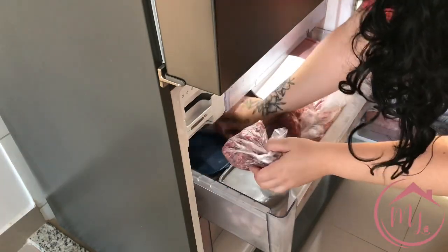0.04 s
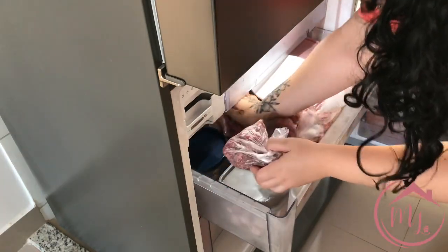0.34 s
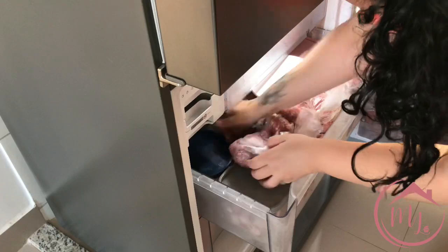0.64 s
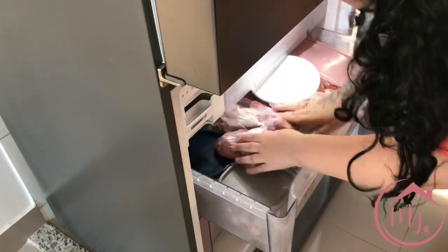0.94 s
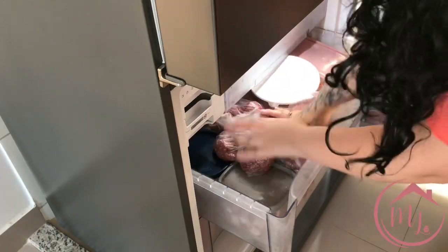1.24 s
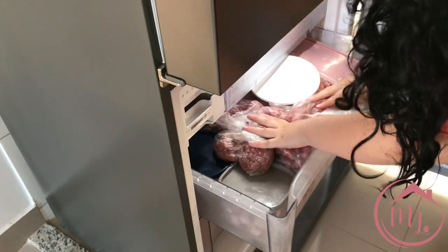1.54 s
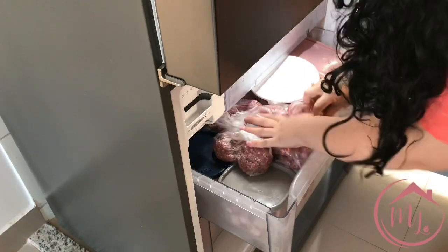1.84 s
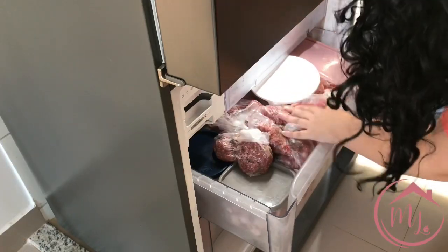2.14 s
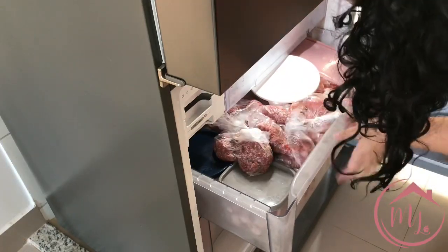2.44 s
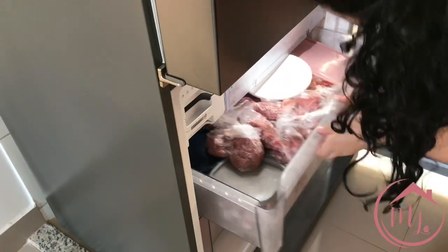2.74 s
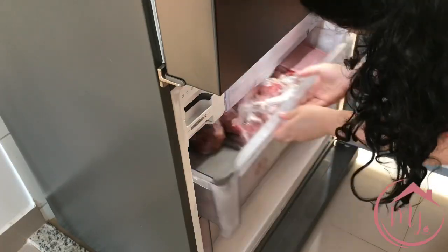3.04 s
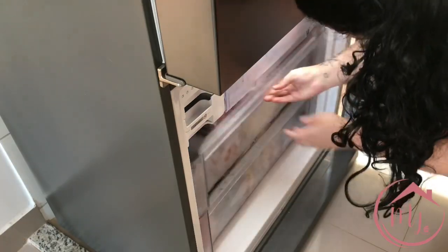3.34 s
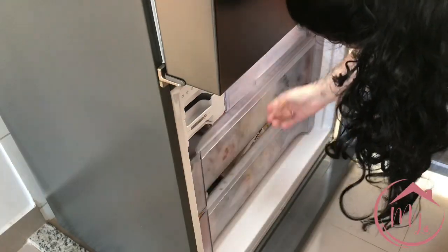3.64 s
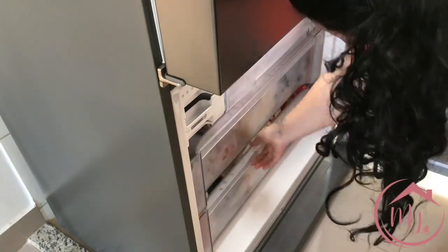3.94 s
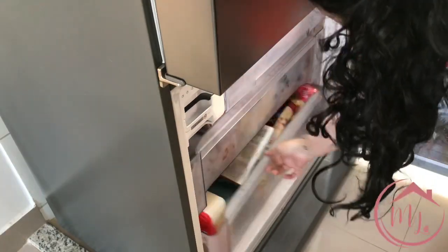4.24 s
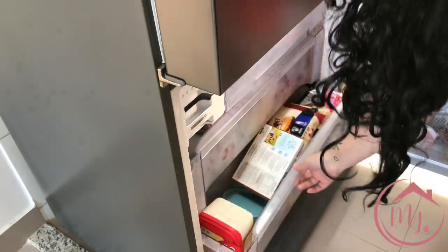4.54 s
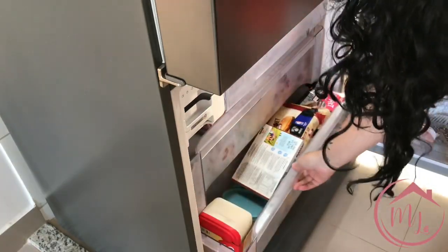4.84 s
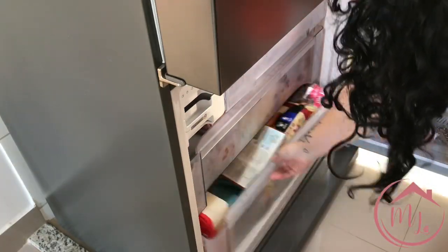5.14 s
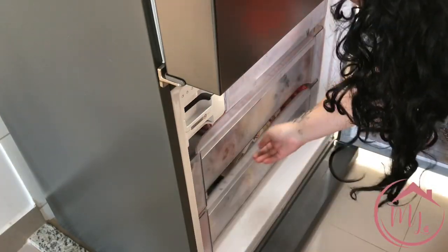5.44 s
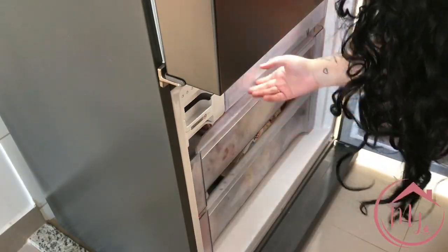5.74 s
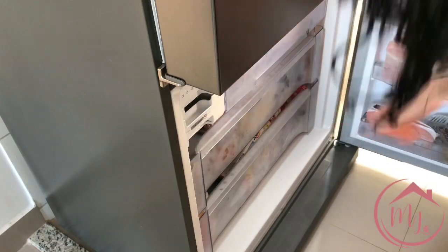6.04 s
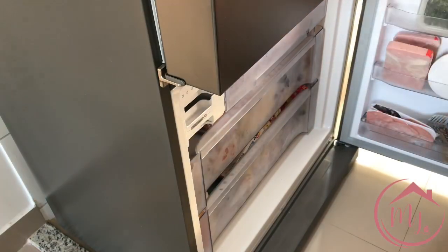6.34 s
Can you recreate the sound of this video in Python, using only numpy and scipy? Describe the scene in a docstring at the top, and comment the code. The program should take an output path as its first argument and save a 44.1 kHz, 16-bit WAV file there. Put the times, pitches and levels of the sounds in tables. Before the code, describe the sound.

Over a freezer's steady hum, hard frozen packs clack together, one plastic drawer slides shut, and another slides out and clatters closed.

```python
"""A freezer hums in a small tiled kitchen. Hands rub thin plastic bags, with a faint whistle at first,
while rock-hard packs of meat drop into a drawer, cracking together and knocking its floor.
The hands smooth the film until it catches and judders, and arms brush the plastic.
The upper drawer grinds home on its runners and stops with a thud that rocks its load.
The lower one slides out, then is shut with a clatter, and its contents settle."""
import sys
import numpy as np
from scipy import signal
from scipy.fft import rfft, irfft, next_fast_len
from scipy.io import wavfile
from scipy.ndimage import map_coordinates

SR = 44100
rng = np.random.default_rng(int(sys.argv[2]) if len(sys.argv) > 2 else 0)


def to_wav(s):
    """Save 16-bit WAV."""
    ch = np.atleast_2d(s).T  # columns
    pcm = np.round(np.clip(ch, -1, 1) * 32767)  # PCM
    wavfile.write(sys.argv[1], SR, pcm.astype(np.int16))


N = 291060
TIME = np.arange(N) / SR
AGE = TIME[:SR // 2]  # time since a contact [s]
# the lower drawer's stiff rim; every slide sings at these pitches: (pitch [Hz], level [dB], t60 [s])
RIM_MODES = [(2640, -13, 0.077), (2820, 1, 0.13), (2940, 0, 0.14), (3015, 12, 0.041), (3200, 2, 0.12),
             (3377, -23, 0.13)]


def amp(db):
    """Decibels to gain."""
    return 10 ** (np.asarray(db) / 20)


def unit(x):
    """Scale to rms 1."""
    return x / np.sqrt(np.mean(x ** 2) + 1e-20)


def unit_blow(x):
    """Scale a blow to rms 1 as if it lasted 20 ms."""
    return x / np.sqrt(np.sum(x ** 2) / (SR * .02))


def fade(t, t60):
    """Exponential decay, 60 dB in t60."""
    return np.exp(-np.log(1000) * t / t60)


def along(points, hz):
    """Read a curve of (Hz, value) points on a log frequency axis."""
    freqs, values = np.transpose(points)
    return np.interp(np.log(hz + 1), np.log(freqs + 1), values)


def wobble(rate):
    """A smooth random curve, rate knots a second."""
    return map_coordinates(rng.standard_normal(int(N * rate / SR) + 4), [TIME * rate])


def coloured(x, points):
    """Minimum-phase EQ through the (Hz, dB) points."""
    size = 2 * next_fast_len(len(x) // 2 + 4096)
    cepstrum = irfft(np.log(amp(along(points, np.fft.rfftfreq(size, 1 / SR)))))
    cepstrum[1:size // 2] *= 2
    cepstrum[size // 2 + 1:] = 0
    return irfft(rfft(x, size) * np.exp(rfft(cepstrum)))[:len(x)]


def add(track, s, x):
    """Mix x into the track at s seconds."""
    i = max(round(s * SR), 0)
    track[i:i + len(x)] += x[:N - i]


def gate(start, stop, attack, release):
    """Linear attack, hold until stop, then a release given as t60; all in seconds."""
    return np.clip((TIME - start) / attack, 0, 1) * fade(np.maximum(TIME - stop, 0), release)


def strokes(rows, attack, release):
    """Envelope of a series of strokes; the pressure swells or sags evenly through each."""
    power = np.zeros(N)
    for s, length, db, swell_db in rows:
        progress = np.clip((TIME - s) / length, 0, 1)
        power += (amp(db + swell_db * (progress - .5)) * gate(s, s + length, attack, release)) ** 2
    return np.sqrt(power)


def friction(spectrum, grain_db, grain_rate):
    """Countless tiny slips of uneven size, rms 1."""
    return unit(coloured(rng.standard_normal(N) * amp(grain_db * wobble(grain_rate)), spectrum))


def burst(spectrum, t60):
    """A crowd of damped modes: coloured noise that dies away."""
    return unit_blow(coloured(rng.standard_normal(len(AGE)) * fade(AGE, t60), spectrum))


def ring(modes):
    """Modes struck at new strengths each blow, t60 held to 20-300 ms; loose contacts blur their pitch."""
    hz, db, t60 = np.transpose(modes)[:, :, None]
    strength = amp(db + 2 * rng.standard_normal(db.shape)) * rng.choice([-1, 1], db.shape)
    drift = np.cumsum(rng.standard_normal((len(hz), len(AGE))), 1) * np.sqrt(0.053 * hz / SR)
    decay = fade(AGE, np.clip(t60, .02, .3))
    return unit_blow(np.sum(strength * np.sin(2 * np.pi * hz * AGE + drift) * decay, 0))


def clack(hz, shape, t60):
    """A broad, short resonance around hz."""
    # where the shape's EQ points sit: (multiple of the pitch [ratio])
    steps = np.array([.2, .5, .8, 1, 1.15, 1.45, 2, 4])
    return burst(np.column_stack([hz * steps, shape]), t60)


def kitchen(x, wet_db):
    """The sound plus a diffuse tail from the tiled room."""
    # room decay: (frequency [Hz], t60 [s])
    decay_times = [(100, 0.65), (500, .38), (3000, 0.38), (8000, 0.27), (15000, 0.13)]
    hz, t, noise = signal.stft(rng.standard_normal(len(AGE)), SR, nperseg=256)
    decaying = noise * fade(t, along(decay_times, hz)[:, None])
    tail = signal.istft(decaying, SR, nperseg=256)[1][:len(AGE)]
    tail *= 1 - np.exp(-AGE / 0.0025)
    return x + amp(wet_db) * signal.fftconvolve(x, tail / np.linalg.norm(tail))[:len(x)]


def freezer():
    """The compressor's slightly unsteady tones over a bed of fan noise."""
    # compressor hum and whine: (pitch [Hz], level [dB])
    tones = [(88, -57), (172, -63.5), (220.7, -61), (5631, -80.5), (5949, -92)]
    # fan and room air: (frequency [Hz], gain [dB])
    air_eq = [(15, -32.5), (30, -34.5), (42, -3.5), (55, -5.5), (87, -1.5), (170, -8.5), (301, -14),
              (545, -20), (936, -25.5), (1840, -30), (4490, -39.5), (7000, -44), (10500, -49),
              (15500, -48.5)]
    hum = np.zeros(N)
    for hz, db in tones:
        peak = amp(db + 1.3 * wobble(11)) * np.sqrt(2)
        hum += peak * np.sin(2 * np.pi * hz * TIME + 0.53 * wobble(7.1))
    return hum + amp(-47) * unit(coloured(rng.standard_normal(N), air_eq))


def film():
    """Thin bags hiss under the hands and scrunch where they are pressed."""
    # hands rubbing the bags: (time [s], length [s], level [dB], swell [dB])
    rubs = [(0, 0.19, -48, 2.5), (.27, 0.19, -50, -2), (.56, 0.07, -42.5, 5.5), (.70, 0.24, -41.5, -0.5),
            (1.02, 0.12, -37, 3.5), (1.24, 0.81, -45.5, -3), (1.53, 0.3, -38.5, -5), (1.81, 0.4, -44, -1.5)]
    # quick scrunches: (time [s], half width [s], level [dB])
    scrunches = [(.205, 0.00052, -35), (2.068, 0.017, -31), (2.096, 0.0092, -29.5), (4.123, 0.0034, -43.5),
                 (4.159, .003, -43), (4.445, .003, -49)]
    # hiss of the film: (frequency [Hz], gain [dB])
    hiss_eq = [(290, -35), (500, 1), (640, -4.5), (718, -4.5), (1190, 0.5), (1570, -2.5), (2330, -1),
               (3060, -0.5), (4210, -1), (9770, -1.5), (10500, -3), (15100, 2), (16000, -2.5)]
    attack_s, release_s = 0.013, .14
    held = amp(-47) * gate(0, 2.213, attack_s, release_s)  # the film whispers as long as it is held
    level = np.hypot(held, strokes(rubs, attack_s, release_s)) * amp(.7 * wobble(35))
    for s, width, db in scrunches:
        level += amp(db) * np.exp(-((TIME - s) / width) ** 2)
    return kitchen(level * friction(hiss_eq, grain_db=1.1, grain_rate=430), wet_db=-12.5)


def whistle():
    """A faint, thin whistle that swells and wavers in pitch."""
    # its one swell: (time [s], length [s], level [dB], swell [dB])
    swells = [(0, 0.46, -65, 12)]
    tone = unit(np.sin(2 * np.pi * 4705 * TIME + 1.55 * wobble(90)))
    return strokes(swells, attack=.02, release=.2) * tone


def packs():
    """Rock-hard packs crack against each other and knock the drawer floor."""
    # packs landing: (time [s], knock [dB], clack [dB], clack pitch [Hz], crack [dB])
    landings = [(.080, -44, -60.5, 1300, -61.5), (.621, -41.5, -49, 3000, -44),
                (.691, -32, -43.5, 2200, -44.5), (.735, -40, -55.5, 2200, -38), (.797, -39, -56, 2200, -53),
                (.848, -34, -34, 1790, -59.5), (.944, -25.5, -24.5, 4900, -20),
                (.961, -24, -27.5, 3700, -40), (.985, -49, -33.5, 4500, -27),
                (1.129, -34.5, -37.5, 4500, -38), (1.249, -35, -36.5, 4400, -43),
                (1.377, -40, -39, 4700, -43)]
    # packs on the drawer floor: (pitch [Hz], level [dB], t60 [s])
    floor_modes = [(189.2, 2.5, 0.65), (234, -12, 0.47), (428, -16.5, 0.11), (494, -3.5, 0.4),
                   (800, -19, 0.21), (850, 0.5, 0.76), (966, -1, 0.58), (1086, -6.5, 0.72),
                   (1109, -11.5, 0.073), (1206, -7, 0.96), (1255, -6, 0.16), (1423, 3, 0.057)]
    # frozen blocks ringing: (pitch [Hz], level [dB], t60 [s])
    ice_modes = [(3500, 1.5, .16), (4230, -1.5, .22), (4110, 2.5, 0.16), (5240, -15, .12), (5840, 6, 0.071),
                 (6070, -7, .15), (9110, -5, 0.14)]
    # dull body of the knock: (frequency [Hz], gain [dB])
    knock_eq = [(80, -20.5), (190, 2), (400, -4.5), (550, -2), (950, -7), (1400, -18.5), (2500, -17.5),
                (6000, -37.5)]
    # bright edge of the crack: (frequency [Hz], gain [dB])
    crack_eq = [(2000, -34), (5500, -3), (7000, -6), (8000, -7), (9400, 5), (10500, -7.5), (12100, 1),
                (14500, 2.5), (16000, -0.5)]
    # frozen lumps, at each step of a clack: (gain [dB])
    lump_shape = [-19.5, -3, -6.5, -0.5, -4, -18.5, -7.5, -34]
    out = np.zeros(N)
    for s, knock_db, clack_db, clack_hz, crack_db in landings:
        t60 = 0.097 * amp(-.3 * (clack_db + 34))  # a harder clack dies faster
        knock = amp(-6.5) * ring(floor_modes) + amp(-1) * burst(knock_eq, 0.26)
        # a hard contact starts with a sharp tick and sets the ice ringing
        crack = amp(-1) * burst(crack_eq, t60) + amp(-24) * burst(crack_eq, .004)
        crack += amp(-7.5) * ring(ice_modes)
        lump = clack(clack_hz, lump_shape, t60)
        blow = amp(knock_db) * knock + amp(clack_db) * lump + amp(crack_db) * crack
        add(out, s, kitchen(blow, wet_db=-4))
    return out


def thuds():
    """The whole load rocks when a pack lands or a drawer is stopped."""
    # shoves to the tub: (time [s], level [dB], pitch driven hardest [Hz])
    pushes = [(1.149, -25.5, 195), (3.421, -9.5, 98), (5.394, -9, 178), (5.442, -19, 180)]
    # the loaded tub: (pitch [Hz], level [dB], t60 [s])
    load_modes = [(50.6, -10.5, 0.3), (100.8, 3, 0.11), (138, -13.5, 0.13), (187, -1.5, 0.12),
                  (282, -2, 0.033)]
    db_per_octave = 8  # modes away from the push's pitch ring less
    hz, mode_db, t60 = np.transpose(load_modes)[:, :, None]
    out = np.zeros(N)
    for s, db, push_hz in pushes:
        strength = amp(db + mode_db - db_per_octave * np.abs(np.log2(hz / push_hz)))
        boom = np.sum(strength * np.sin(2 * np.pi * hz * AGE) * fade(AGE, t60), 0)
        add(out, s, boom * (1 - np.exp(-AGE / 0.0026)))
    return kitchen(out, wet_db=-13)


def judders():
    """A hand sticks and slips on taut film: a short low note with a rasp once a cycle."""
    # the hand catching: (time [s], length [s], slip rate [Hz], level [dB], relative rasp [dB])
    catches = [(2.096, 0.024, 268, -32.5, -15.5), (2.314, 0.041, 285.3, -33.5, -8)]
    # colour of the rasp: (frequency [Hz], gain [dB])
    rasp_eq = [(300, -2.5), (1000, -9.5), (1800, -4), (3200, -17), (9000, -25)]
    out = np.zeros(N)
    for s, length, hz, db, rasp_db in catches:
        swell = AGE / length * np.exp(-2 * (AGE / length) ** 2)
        swell = amp(db) * swell / swell.max()
        swing = np.sin(2 * np.pi * hz * AGE)
        rasp = unit(coloured(rng.standard_normal(len(AGE)) * (1 + swing), rasp_eq))
        add(out, s, swell * swing + kitchen(amp(rasp_db) * swell * rasp, wet_db=-5.5))
    return out


def brushing():
    """Arms and bags brush the plastic; firm strokes have more body."""
    # brush strokes: (time [s], length [s], level [dB], swell [dB], relative body [dB])
    brushes = [(2.22, .08, -60.5, 3, -3), (2.31, .05, -57, -2, -2), (2.38, 0.65, -62, 4, 2),
               (3.072, 0.11, -48.5, 2.5, -5), (3.29, .06, -62, 4, -5), (3.878, 0.12, -56.5, -8, 1),
               (4.096, 0.26, -57.5, 8, -3), (4.39, .18, -58.5, -5, 7), (5.115, .38, -53, 6, 3),
               (5.716, .02, -60, 3, 1), (6.17, .43, -65.5, -3, -9.5), (6.375, 0.033, -54.5, -3, -8)]
    # brushed plastic: (frequency [Hz], gain [dB])
    brush_eq = [(300, -34.5), (1000, -22), (2500, 2), (4300, -1), (7000, -1.5), (10300, -4.5), (13000, 0),
                (16000, -8)]
    crossover_hz, attack_s, release_s = 3600, .012, .2
    hiss = friction(brush_eq, grain_db=2.3, grain_rate=630)
    body = signal.sosfilt(signal.butter(3, crossover_hz, "low", fs=SR, output="sos"), hiss)
    fizz = signal.sosfilt(signal.butter(3, crossover_hz, "high", fs=SR, output="sos"), hiss)
    touch = strokes([row[:-1] for row in brushes], attack_s, release_s)
    body_rows = [(s, length, db + body_db, swell_db) for s, length, db, swell_db, body_db in brushes]
    weight = strokes(body_rows, attack_s, release_s)
    return kitchen((touch * fizz + weight * body) * amp(1.1 * wobble(30)), wet_db=-8.5)


def sliding():
    """Drawers grind on their runners, louder with speed, and their contents settle after a jolt."""
    # drawer runs: (start [s], fastest [s], stop [s], full-speed grind [dB], final rim singing [dB])
    slides = [(2.487, 3.14, 3.4, -54, -69), (4.09, 4.372, 4.56, -44.5, -54.5),
              (5.024, 5.278, 5.4, -44, -60)]
    # contents rattling: (time [s], level [dB])
    jolts = [(3.42, -42.5), (3.9, -50.5), (5.4, -33), (5.75, -54)]
    # grind of the runners: (frequency [Hz], gain [dB])
    runner_eq = [(25, -30), (80, -3), (170, -2), (350, 1.5), (600, -4.5), (900, -9.5), (1120, 2),
                 (1500, -4.5), (2550, -8), (2900, -13), (3400, -10), (9000, -26)]
    slow_db, sing_rise_db = -13, 21  # toward the stop the grind eases and the binding rim sings louder
    running, binding = np.zeros(N), np.zeros(N)
    for start, fastest, stop, db, sing_db in slides:
        moving = gate(start, stop, attack=0.018, release=0.081)
        running += moving * amp(db + np.interp(TIME, [start, fastest, stop], [slow_db, 0, slow_db]))
        binding += moving * amp(sing_db + np.interp(TIME, [start, stop], [-sing_rise_db, 0]))
    settling = sum(amp(db) * gate(s, s, attack=.005, release=.55) for s, db in jolts)
    grinding = np.hypot(running, settling) * friction(runner_eq, grain_db=2.5, grain_rate=200)
    rim = unit(sum(amp(db) * wobble(170) * np.sin(2 * np.pi * hz * TIME) for hz, db, _ in RIM_MODES))
    return kitchen(grinding + binding * rim, wet_db=-9.5)


def drawer(contacts, modes, wall_eq, rim, thump_db):
    """Each contact shakes the tub, rings its stiff rim and clacks at a pitch set by where it lands."""
    # low thump of the tub: (frequency [Hz], gain [dB])
    thump_eq = [(20, -13), (38, -13), (55, -16), (110, 3), (165, 3), (260, -11), (600, -45)]
    # bright crack of plastic: (frequency [Hz], gain [dB])
    crack_eq = [(1500, -33), (5000, -0.5), (7000, -3), (8800, -3), (10500, -7), (13000, -4.5),
                (16000, -11.5)]
    # hollow plastic, at each step of a clack: (gain [dB])
    tub_shape = [-25, -8, -3.5, 2.5, -3.5, -10.5, -14.5, -35]
    skew_s, far_db = .0055, -4.5  # the drawer runs askew: its far corner clacks later and weaker
    out = np.zeros(N)
    for s, knock_db, clack_db, clack_hz, crack_db in contacts:
        knock = amp(-4) * ring(modes) + amp(-1) * burst(wall_eq, t60=.17)
        knock += amp(thump_db) * burst(thump_eq, t60=0.13)
        contact_s = 0.0012 * amp(-.35 * (clack_db + 24.5))  # a gentle touch presses longer
        give = 1 - np.exp(-AGE / contact_s)
        near, far = [give * (amp(clack_db) * clack(clack_hz, tub_shape, t60=0.038)
                             + amp(crack_db) * burst(crack_eq, t60=0.032)) for corner in range(2)]
        snap = amp(crack_db - 8) * burst([(2000, -25), (8000, -4), (14000, 1.5)], .006)  # first touch
        blow = near + snap + give * (amp(knock_db) * knock + amp(clack_db - 10) * ring(rim))
        blow += amp(far_db) * np.pad(far, (round(skew_s * SR), 0))[:len(AGE)]
        add(out, s, kitchen(blow, wet_db=-6))
    return out


def upper_drawer():
    """The upper drawer bumps along its rails and hits the stop."""
    # hits on rails and stop: (time [s], knock [dB], clack [dB], clack pitch [Hz], crack [dB])
    contacts = [(2.582, -43, -49, 1500, -59), (2.687, -36, -27, 2170, -48.5),
                (2.847, -38.5, -42, 2350, -60), (2.891, -47.5, -43, 1720, -52.5),
                (3.4125, -22.5, -37, 3240, -48.5), (3.468, -39, -62, 1600, -68),
                (3.503, -38.5, -52, 2010, -50.5)]
    # the tub ringing: (pitch [Hz], level [dB], t60 [s])
    tub_modes = [(268.6, -2, 0.19), (332, 3, 0.16), (407, 2, 0.1), (460, 4.5, 0.057), (598, -22, 0.056),
                 (636, -14, 0.23), (816, -27, .1), (988, -13.5, .12)]
    # knock of its walls: (frequency [Hz], gain [dB])
    wall_eq = [(120, -15), (290, 1), (450, -6), (700, -5), (1000, -12), (1500, -20.5), (5000, -35)]
    # its stiff rim: (pitch [Hz], level [dB], t60 [s])
    rim_modes = [(2030, -2, .11), (2060, -2, .11), (2260, 11, .08), (2430, -9, .1), (2340, -2, .1),
                 (2510, 2, .1)]
    return drawer(contacts, tub_modes, wall_eq, rim_modes, thump_db=-3)


def lower_drawer():
    """The lower drawer ticks over its rails on the way out and clatters shut."""
    # hits on rails, stop and hand: (time [s], knock [dB], clack [dB], clack pitch [Hz], crack [dB])
    contacts = [(3.899, -48.5, -48, 1693, -69), (4.046, -47.5, -47, 1940, -70),
                (4.138, -46, -47, 3050, -54), (4.383, -41.5, -41.5, 1550, -47),
                (5.125, -44, -49.5, 2600, -59), (5.188, -43, -28, 2800, -28),
                (5.351, -39.5, -41, 2860, -62), (5.376, -45, -30.5, 2940, -51),
                (5.3825, -26.5, -23.5, 2980, -28), (5.398, -23, -23.5, 2950, -34),
                (5.438, -37, -30, 3020, -37.5), (5.749, -38.5, -39, 3400, -38.5),
                (5.773, -41.5, -42.5, 3160, -45.5), (5.898, -48, -48, 4020, -75),
                (6.000, -56, -50, 3720, -78)]
    # the tub ringing: (pitch [Hz], level [dB], t60 [s])
    tub_modes = [(253, -1, 0.028), (358, 4.5, 0.28), (397, 4.5, 0.1036), (620.7, -2.5, 0.38),
                 (802, 4.5, 0.062), (976, 6.5, 0.12), (1084, -38, 0.28), (1122, -17, 0.095),
                 (1440, 1, 0.1446)]
    # knock of its walls: (frequency [Hz], gain [dB])
    wall_eq = [(120, -11.5), (250, 11.5), (340, -5), (460, 0.5), (800, -2.5), (1200, -7.5), (1900, -17),
               (5000, -39.5)]
    return drawer(contacts, tub_modes, wall_eq, RIM_MODES, thump_db=0.5)


def scene():
    """Everything at one microphone above the drawers."""
    impacts = upper_drawer() + lower_drawer() + packs() + thuds()
    handling = film() + judders() + brushing()
    return (impacts + handling + sliding() + whistle() + freezer())[None]


def record(dry):
    """A steep low cut trims the deepest bass and a brick wall takes off the very top."""
    low_cut_hz, top_hz = 41, 15950
    thin = signal.sosfilt(signal.butter(8, low_cut_hz, "high", fs=SR, output="sos"), dry)
    size = next_fast_len(N + SR // 2)
    passband = np.fft.rfftfreq(size, 1 / SR) < top_hz
    return irfft(rfft(thin, size) * passband, size)[:, :N]


dry = scene()
out = record(dry)
to_wav(out)
```